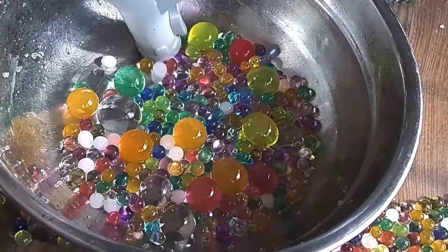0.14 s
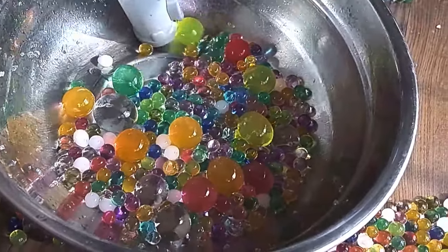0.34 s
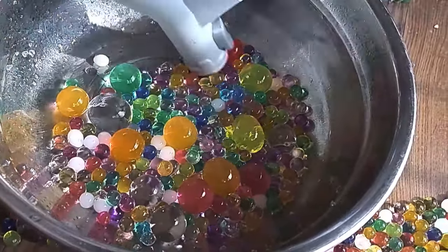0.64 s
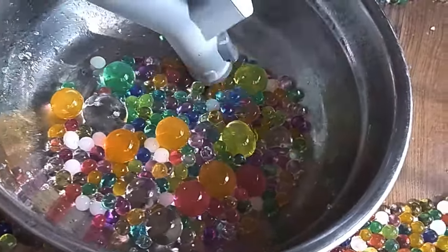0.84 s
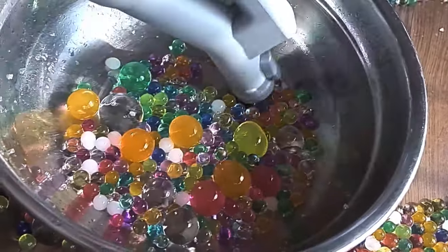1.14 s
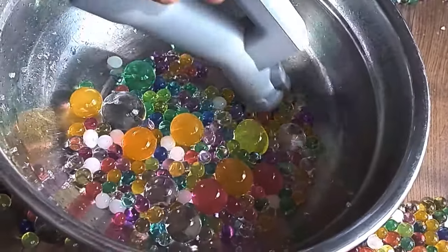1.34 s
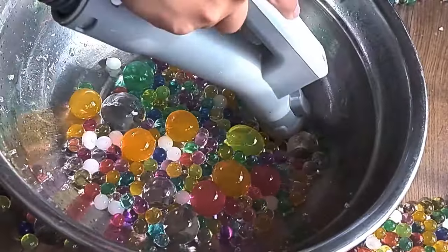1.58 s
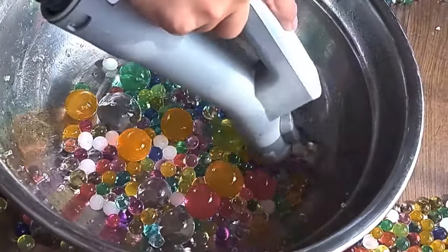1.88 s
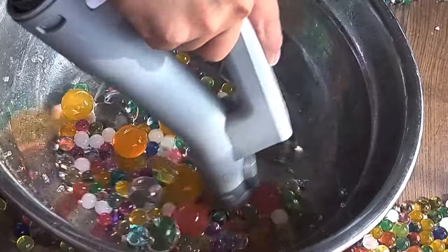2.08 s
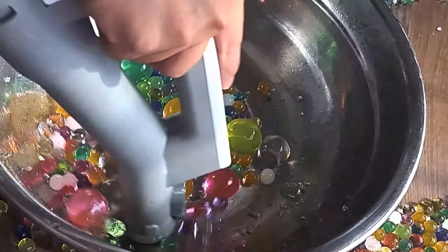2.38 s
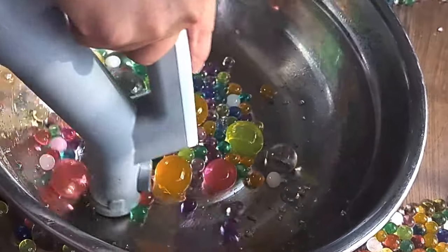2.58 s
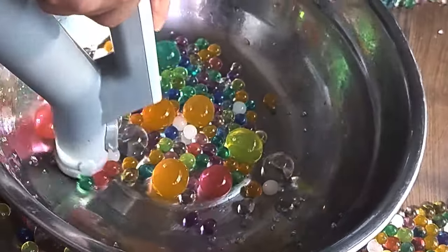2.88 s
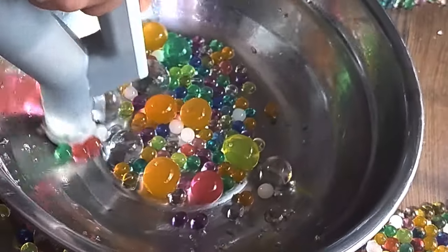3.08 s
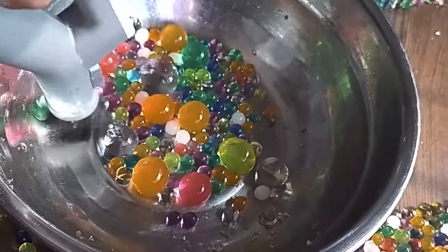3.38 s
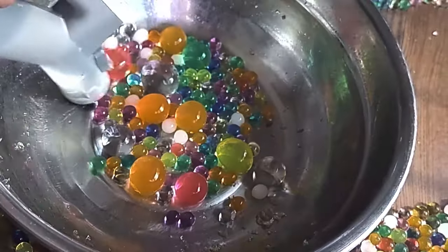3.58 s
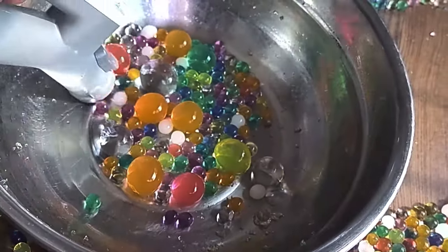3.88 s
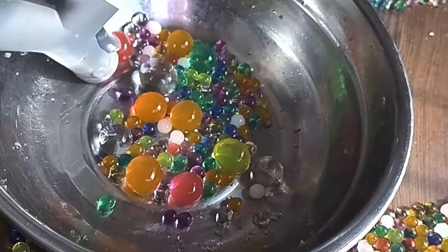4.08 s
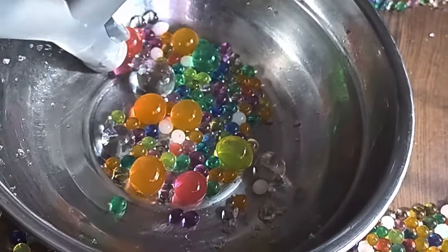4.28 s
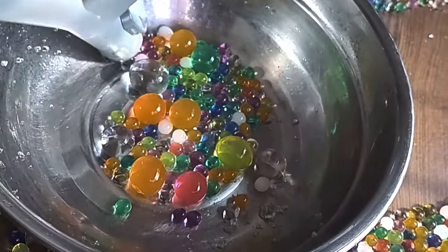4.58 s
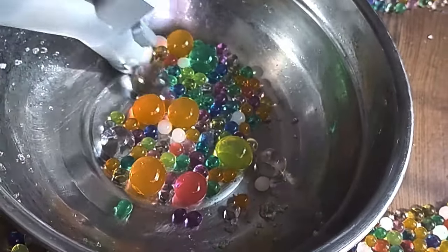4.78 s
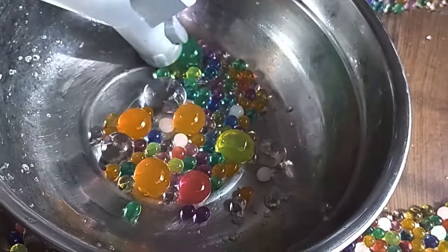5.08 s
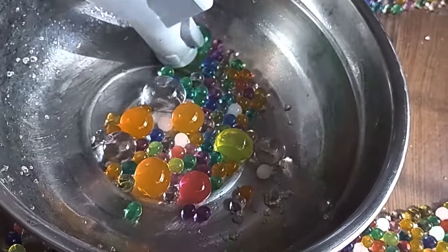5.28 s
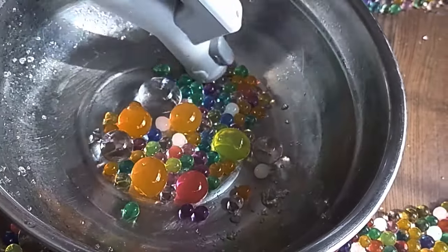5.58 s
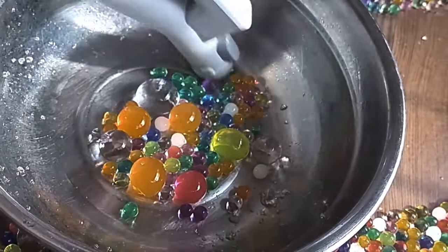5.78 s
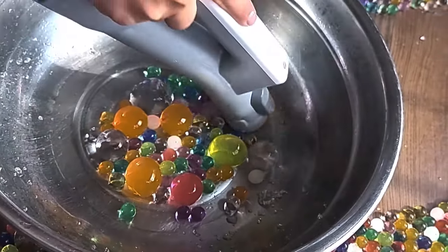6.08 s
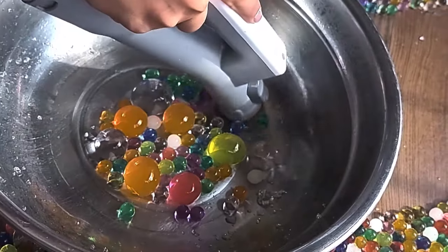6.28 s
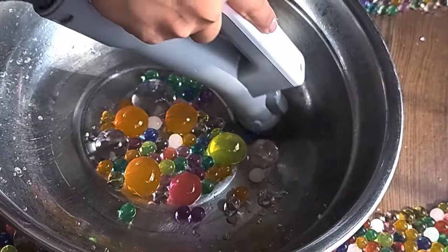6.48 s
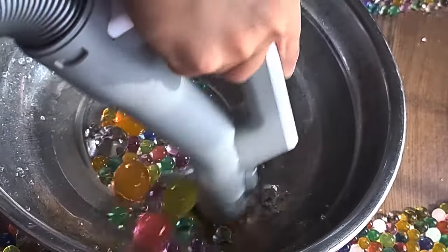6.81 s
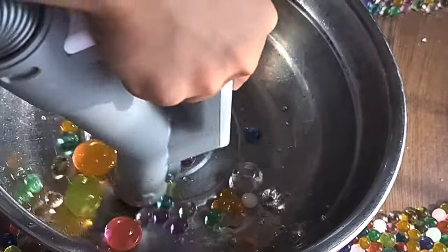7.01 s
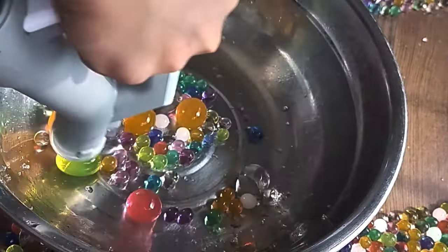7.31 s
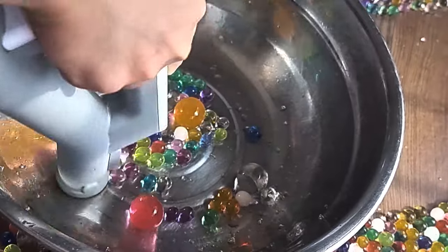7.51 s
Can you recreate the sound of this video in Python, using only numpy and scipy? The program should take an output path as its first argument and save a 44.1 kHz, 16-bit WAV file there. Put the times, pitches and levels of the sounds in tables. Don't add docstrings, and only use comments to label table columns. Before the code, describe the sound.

A small handheld vacuum runs without pause, a thin wavering whine over rough buzz and airy hiss. Beads tumble in a steel bowl with low rumbles, heavy thumps and short metallic taps, densest in the first second and a half. After about three seconds the nozzle repeatedly lands on the steel and buzzes loudly, mostly on the right. Very close stereo microphones beneath the bowl, little room sound.

```python
import sys
import numpy as np
from scipy import signal
from scipy.fft import rfft, irfft, next_fast_len
from scipy.io import wavfile
from scipy.ndimage import uniform_filter1d

SR = 44100
rng = np.random.default_rng(int(sys.argv[2]) if len(sys.argv) > 2 else 0)


def voltage_ratio(level):
    return 10 ** (np.asarray(level, float) / 20)


def unload_audio(sound):
    columns = np.transpose(np.atleast_2d(sound))
    steps = np.round(np.clip(columns, -1, 1) * 32767)
    wavfile.write(sys.argv[1], SR, steps.astype(np.int16))


N = 337365
TIME = np.arange(N) / SR


def columns(table):
    s, *rest = np.transpose(table)
    return [np.interp(TIME, s, c) for c in rest]


def unit(x):
    return x / np.sqrt(np.mean(x ** 2))


def smooth_twice(x, span):
    return uniform_filter1d(uniform_filter1d(x, span), span)


def walk(rate_hz):
    hold = int(SR / rate_hz)
    steps = np.repeat(rng.standard_normal(N // hold + 1), hold)
    return unit(smooth_twice(steps, hold)[:N])


def colour(x, shape):
    hz, db = np.transpose(shape)
    size = next_fast_len(N)
    bins_hz = np.maximum(np.arange(size // 2 + 1) * SR / size, 1)
    gain_db = np.interp(np.log(bins_hz), np.log(hz), db, left=-90, right=-90)
    return unit(irfft(rfft(x, size) * voltage_ratio(gain_db), size)[..., :N])


def ring(x, modes):
    out = 0
    for k, (hz, t60_s, db) in enumerate(modes):
        radius = np.exp(-np.log(1000) / (max(t60_s, .004) * SR))
        w = 2 * np.pi * hz / SR
        poles = [1, -2 * radius * np.cos(w), radius ** 2]
        out = out + (-1) ** k * voltage_ratio(db) * signal.lfilter([1, 0, -1], poles, x)
    return out


def total(*levels_db):
    return 10 * np.log10(sum(voltage_ratio(2 * np.maximum(db, -200)) for db in levels_db))


def sides(db, pan_db):
    db = db - 20 * np.log10(np.cosh(pan_db * np.log(10) / 40))
    return db + pan_db / 2, db - pan_db / 2


def place(x, left_db, right_db, alike, late=0):
    left, other = x if x.ndim > 1 else (x, x)
    right = alike * left + np.sqrt(1 - alike ** 2) * other
    if late:
        lag_s = late * np.tanh((left_db - right_db) / 3) / 2 / SR
        left = np.interp(TIME + lag_s, TIME, left)
        right = np.interp(TIME - lag_s, TIME, right)
    return np.array([left * voltage_ratio(left_db), right * voltage_ratio(right_db)])


def add(out, s, hit, pan_db):
    i = int(s * SR)
    out[:, i:i + len(hit)] += np.outer(voltage_ratio(sides(0, pan_db)), hit)[:, :N - i]


def bursts(rows, rise_db_s, fall_db_s):
    s, length, first, last = (c[:, None].astype(np.float32) for c in np.transpose(rows))
    since = TIME.astype(np.float32) - s
    hold = first + (last - first) * np.clip(since / np.maximum(length, .001), 0, 1)
    return hold - rise_db_s * np.maximum(-since, 0) - fall_db_s * np.maximum(since - length, 0)


# frequency in Hz, level in dB per Hz.
DRONE_SPECTRUM = [(18, -39), (30, -10), (74, 5.5), (433, -5.5), (589, -13.5), (657, -16), (998, -18),
                  (1630, -54), (2060, -4), (2300, -54), (2990, -69), (5060, -120)]


def idle(share):
    press_gain_db = 3
    swell = voltage_ratio(0.79 * walk(15) + press_gain_db * share)
    drone = colour(rng.standard_normal((2, N)), DRONE_SPECTRUM) * swell
    return place(drone, -44, -43.7, alike=0.75)


# time in seconds, blade tone in Hz.
MOTOR_SPEED = [(0, 10675), (.6, 10668), (.92, 10727), (1.33, 10792), (1.66, 10738), (2.0, 10700),
               (2.5, 10670), (3.15, 10735), (3.58, 10648), (3.9, 10695), (4.45, 10655), (4.75, 10695),
               (5.2, 10675), (5.8, 10775), (5.98, 10742), (6.55, 10897), (7.03, 10905), (7.4, 10875)]
BLADES = 18


def motor():
    blade_hz, = columns(MOTOR_SPEED)
    return blade_hz, np.cumsum(blade_hz) / BLADES / SR


# time in seconds, nearness as dB of airborne buzz, lean as left minus right in dB.
NOZZLE_PATH = [(0, -48, 3.5), (.55, -48.5, 4), (.74, -46, 23.5), (.89, -44, 7.5), (1.09, -40.5, 27),
               (1.21, -40, 24.5), (1.43, -40.5, 5), (1.65, -43.5, 8), (2.3, -46, 9), (2.6, -43, 3),
               (2.8, -44, 4), (3.03, -38.5, -9.5), (3.3, -41.5, -10.5), (3.93, -46, -21.5), (4.9, -43, -19),
               (5.05, -45.5, -20.5), (7.0, -44, -16.5), (7.52, -45.5, -15.5)]


def nozzle():
    return columns(NOZZLE_PATH)


def leans(share):
    _, lean_db = nozzle()
    return 0.42 * lean_db - 0.5 * share, 0.7 * lean_db - 8 * share


def heard(press_db, air_db, lean, steel_db, left_db=0, right_db=0):
    steel_leak_db = -32
    near_db, lean_db = nozzle()
    left, right = sides(near_db + air_db, lean * lean_db)
    through_steel_db = press_db + steel_db
    return total(left + left_db, through_steel_db + steel_leak_db), total(right + right_db, through_steel_db)


EAR_LAG = 17


def bowl_echoes(x):
    t60_s, share = 0.05, 0.75
    t = np.arange(2048) / SR
    tail = rng.standard_normal((2, len(t))) * np.exp(-np.log(1000) * t / t60_s)
    tail *= share / np.sqrt(np.sum(tail ** 2, axis=1, keepdims=True))
    tail[:, 0] = 1
    return unit(signal.fftconvolve(x, tail, axes=1)[:, :N])


def lines(turns, orders, levels_db):
    out = 0
    for order, db in zip(orders, levels_db):
        waver = voltage_ratio(db + 4.5 * walk(3.98))
        out = out + waver * np.sin(2 * np.pi * (order * turns + rng.random()))
    return out


def contact(x, drone_db, fizz_db):
    drone = signal.sosfiltfilt(signal.butter(3, 1350, fs=SR, output="sos"), x)
    fizz = signal.sosfiltfilt(signal.butter(2, 2500, "high", fs=SR, output="sos"), x)
    return x + (voltage_ratio(drone_db) - 1) * drone + (voltage_ratio(fizz_db) - 1) * fizz


# frequency in Hz, level in dB per Hz.
BUZZ_SPECTRUM = [(300, -30), (520, -4), (750, -17), (1000, 6), (1500, -14.5), (2000, -1.5), (2350, -15),
                 (2780, -5), (3400, -13), (4200, -17), (5500, -19), (6800, -21.5), (8100, -34),
                 (9000, -25.5), (11700, -19.5)]
BUZZ_ORDERS = [2, 3.285, 4.405, 4.68, 5.4, 6.92, 7.09, 8, 9, 9.8, 10]
BUZZ_LINE_DB = [-22, -22, -16, -19, -23, -29, -26, -26, -30, -38, -34]


def buzz(turns, press_db, share, bright_db):
    noise = colour(rng.standard_normal((2, N)), BUZZ_SPECTRUM) * voltage_ratio(1.2 * walk(12))
    x = bowl_echoes(noise) + lines(turns, BUZZ_ORDERS, BUZZ_LINE_DB)
    x = contact(x, drone_db=3.5 - 12 * share, fizz_db=0.97 * bright_db)
    left, right = heard(press_db, air_db=0, lean=1, steel_db=0)
    return place(x, left + 2.1, right + 2.26, alike=0.44, late=EAR_LAG)


# frequency in Hz, level in dB per Hz.
HISS_SPECTRUM = [(7800, -66), (8600, -54), (10000, -38), (11000, -13), (12500, -2.5), (14000, 3),
                 (15400, 4.5), (15650, -42), (16000, -79)]
HISS_ORDERS = [17, 20, 21.2, 22, 23, 24, 25]
HISS_LINE_DB = [-44, -30, -30, -29, -27, -25, -27]


def hiss(turns, press_db, bright_db):
    noise = colour(rng.standard_normal((2, N)), HISS_SPECTRUM) * voltage_ratio(1.6 * walk(36))
    x = bowl_echoes(noise) + lines(turns, HISS_ORDERS, HISS_LINE_DB)
    levels = heard(press_db + 0.62 * bright_db, air_db=3.2, lean=0.56, steel_db=-8.5)
    return place(x, *levels, alike=0.078)


def bowl_gain(tone_hz, peak_hz, width_hz):
    return 1 / np.sqrt(1 + ((tone_hz - peak_hz) / width_hz) ** 2)


# time in seconds, air gain in dB, extra lean in dB, left's phase lead in turns.
WHINE_AIR = [(0, 4.5, 0.5, -0.55), (.6, 2, 1.5, -0.34), (1.0, 2, -3, -0.51), (1.3, 1.5, -0.5, -0.44),
             (1.6, 3.5, -0.5, -0.32), (2.0, 6.5, -1, -0.62), (2.3, 1, 0.5, -.5), (2.7, -6, 0.5, -.5),
             (2.95, -5, -6.5, -.5), (3.3, 1.5, -2.5, -0.29), (3.75, 3.5, 3, -0.65), (4.3, -2, 1, -1.1),
             (4.85, 4.5, 1, -0.42), (5.3, 6, 4, -0.33), (5.6, 2, -11, -0.36), (6.2, 6, -24, -1),
             (6.9, -2.5, -1, -0.79), (7.6, 5, -4, -0.7)]
# time in seconds, depth in dB (1.9 times that at the very centre), half
# width in seconds.
WHINE_FADES = [(.05, 12, .03), (.2, 11, .03), (.5, 8, .04), (.875, 4, .04), (1.25, 4, .04), (1.55, 5, .03),
               (2.36, 7, .04), (2.6, 3, .03), (2.77, 5, .03), (3.19, 10, .04), (3.41, 8, .03),
               (4.02, 6, .02), (4.26, 9, .04), (4.59, 7, .04), (4.7, 6, .03), (4.98, 8, .05),
               (5.35, 9, .04), (5.51, 5, .03), (5.65, 10, .05), (5.98, 8, .04), (6.19, 6, .03),
               (6.33, 11, .07), (6.54, 5, .04), (7.25, 8, .03), (7.36, 8, .03), (7.5, 8, .03)]


def whine(turns, blade_hz, press_db):
    order = 3.557
    gain_db, lean_db, lead = columns(WHINE_AIR)
    jitter = np.cumsum(3.0 * walk(40)) / SR
    tone = np.sqrt(2) * np.sin(2 * np.pi * (order * turns + jitter + np.outer([1, 0], lead)))
    fade_db = sum(1.9 * db * np.exp(-np.abs(TIME - s) / (0.7 * width)) for s, db, width in WHINE_FADES)
    tone *= voltage_ratio(0.8 * walk(20) - fade_db) * bowl_gain(order * blade_hz / BLADES, 2103, 21.4)
    levels = heard(press_db, air_db=9.5, lean=0.79, steel_db=3.67,
                   left_db=gain_db + lean_db / 2, right_db=gain_db - lean_db / 2)
    return tone * voltage_ratio(np.array(levels))


def sister(turns, blade_hz, press_db):
    order = 3.345
    jitter = np.cumsum(5.2 * walk(30)) / SR
    tone = np.sin(2 * np.pi * (order * turns + jitter)) * voltage_ratio(2.6 * walk(8.8))
    tone *= bowl_gain(order * blade_hz / BLADES, 2030, 15)
    return place(tone, *heard(press_db, air_db=-1, lean=1, steel_db=-4), alike=1, late=EAR_LAG)


def shaft_tone(turns, press_db, share):
    tone = np.sqrt(2) * np.sin(2 * np.pi * turns) * voltage_ratio(2.5 * (2 - share) * walk(6))
    return place(tone, *heard(press_db, air_db=-0.89, lean=0.97, steel_db=-17.5), alike=1, late=EAR_LAG)


# time in seconds, air gain left in dB, air gain right in dB.
BLADE_AIR = [(0, 6, 12), (.3, 0, 6), (.7, 0, 0), (.95, 3, 8), (1.15, -13, -2), (1.5, -2, 8), (1.85, -2, 4),
             (2.15, 7, 2), (2.6, -4, 3), (2.9, -1, 1), (3.15, 4, 11), (3.45, 1, 3), (3.7, -7, -5),
             (4.3, -3, 0), (4.75, 2, 0), (5.3, 6, 5), (5.7, -6, 0), (7.0, -7, 5), (7.3, -14, -22)]


def blade_tone(turns, press_db, share):
    lead = np.outer([1, 0], 0.2 * walk(4) - 0.2)
    tone = np.sqrt(2) * np.sin(2 * np.pi * (BLADES * turns + lead))
    flutter_db = 2.0 * (2 - share) * np.array([walk(11), walk(10)])
    left_db, right_db = columns(BLADE_AIR)
    levels = heard(press_db, air_db=-11.5, lean=1, steel_db=-16.5, left_db=left_db, right_db=right_db)
    return tone * voltage_ratio(flutter_db + np.array(levels))


def vacuum(press_db, share, bright_db):
    blade_hz, turns = motor()
    noises = buzz(turns, press_db, share, bright_db) + hiss(turns, press_db, bright_db)
    bearings = whine(turns, blade_hz, press_db) + sister(turns, blade_hz, press_db)
    return noises + bearings + shaft_tone(turns, press_db, share) + blade_tone(turns, press_db, share)


def grains(per_s, spread_db, push_s):
    force = voltage_ratio(spread_db * np.minimum(rng.exponential(size=(2, N)), 3))
    hits = (rng.random((2, N)) < per_s / SR) * force * rng.choice([-1, 1], size=(2, N))
    return signal.lfilter(np.hanning(int(push_s * SR) + 3), 1, hits)


def even(x, span_s):
    return x / np.sqrt(smooth_twice(np.mean(x ** 2, axis=0), int(span_s * SR)))


# frequency in Hz, T60 in seconds, level in dB.
LOW_MODES = [(49.3, 0.17, -17), (69.9, 0.19, -3), (94, 0.069, -3), (150.5, 0.091, -3.5), (205, 0.04, 0),
             (284.7, 0.055, -2), (385.5, 0.063, -7), (535.4, 0.041, -7)]
# frequency in Hz, T60 in seconds, level in dB.
HIGH_MODES = [(779, 0.049, 0), (880, 0.081, -6), (1000, 0.044, -1), (1165, 0.037, 0.5), (1350, 0.0061, 4)]
# start in seconds, length in seconds, rumble in dB, rattle minus rumble in dB.
STIRS = [(0, 0.0092, -31, -26), (0.094, 0.01, -17.5, -23), (0.235, 0.15, -32.5, -5.5),
         (0.64, 0.25, -16.5, -13.5), (0.86, 0.2, -14.5, -9), (1.119, 0.18, -15.5, -4.5),
         (1.465, 0.038, -18.5, -6.5), (1.608, 0.22, -26, -33), (1.987, 0.28, -37, -24),
         (2.256, 0.087, -26, -10), (2.413, 0.57, -34, -0.5), (2.837, 0.14, -27.5, -2),
         (3.07, 0.094, -25.5, 0), (3.205, 0.0099, -13.5, -7), (3.294, 0.2, -28, -25),
         (3.619, 0.17, -18, -9), (4.037, 0.13, -21, -2), (4.202, 0.36, -29.5, 3), (4.543, 0.11, -12, 0),
         (4.952, .01, -16.5, -19), (5.013, 0.15, -26.5, -9), (5.109, 0.093, -28.5, 9),
         (5.265, 0.22, -12.5, -1.5), (5.547, 0.2, -12.5, -2.5), (5.963, 0.079, -23, -13),
         (6.08, 0.12, -31.5, -0.5), (6.915, 0.049, -29, -4), (7.21, 0.078, -46, 5),
         (7.517, 0.047, -25, -7.5), (7.61, .06, -10.5, -4)]


def stirring(press_db, share):
    rows = np.array(STIRS)
    each = bursts(rows[:, [0, 1, 2, 2]], rise_db_s=336, fall_db_s=122)
    rumble_db = total(each.max(axis=0), -35.5 - 6 * share)
    rattle_db = total((each + rows[:, 3:]).max(axis=0), -42.5, press_db - 26)
    rumble_pan, rattle_pan = leans(share)
    rumble = even(ring(grains(per_s=110, spread_db=3.5, push_s=0.0012), LOW_MODES), span_s=0.082)
    rattle = ring(grains(per_s=500, spread_db=2.0, push_s=0.00022), HIGH_MODES)
    rattle = even(rattle * voltage_ratio(2.0 * walk(35)), span_s=0.076)
    out = place(rumble, *sides(rumble_db - 4.0, rumble_pan), alike=0.94)
    return out + place(rattle, *sides(rattle_db - 6.5, rattle_pan), alike=0.85)


# time in seconds, peak in dB, rattle minus peak in dB, thud pitch in Hz.
THUMPS = [(0.083, -10, -9, 184), (.112, -11.5, -11.5, 158), (.228, -16, -23, 156),
          (0.266, -20.5, -27.5, 205), (0.628, -9, -7.5, 199), (0.665, -9.5, -17, 101),
          (0.726, -2.5, -14, 90), (0.835, 0, -9, 106), (0.952, -3.5, -6, 153), (0.977, -4, -4, 122),
          (1.019, -5.5, 0.5, 194), (1.166, 0, -28, 347), (1.198, 0, -10, 260), (1.226, 4.5, -10, 147),
          (1.268, -4, -28, 133), (1.477, 5.5, -31, 205), (1.501, -8.5, -1, 94), (1.643, -12, -15, 167),
          (1.7, -16, -22, 120), (1.87, -17.5, -17, 82), (2.031, -26, -22, 97), (2.096, -23, -20, 81),
          (2.18, -19, -15, 81), (2.288, -11.5, -22, 98), (2.864, -13, -23, 141), (3.206, 0.5, -20, 77.6),
          (3.633, -19, -24, 90), (3.69, 3.5, -22, 144), (4.052, -3, -13, 159), (4.557, -17, -16, 107),
          (4.65, 0, -26, 115), (4.949, -5, -10, 210), (5.237, -8.5, 1, 266), (5.356, -3, -12, 93),
          (5.434, -9, -16, 149), (5.467, -9, -12, 110), (5.583, -4, -9, 102), (5.645, -8, -4, 95),
          (5.701, -5.5, -8, 105), (5.749, -7, -18, 109), (5.99, -3.5, -15, 146), (6.167, -22, -20, 80),
          (6.95, -15, -28, 103), (7.094, -33, -20, 73), (7.222, -26, -20, 83), (7.512, -20, -9, 73),
          (7.563, -7.5, -24, 175)]


def thumps(share):
    out = np.zeros((2, N))
    t = np.arange(SR // 4) / SR
    rumble_pan, _ = leans(share)
    for s, db, high_db, hz in THUMPS:
        wait, sign = rng.random(2)
        blow = np.exp(-((t - 0.0016) / 0.00052) ** 2)
        blow += 2.3 * (sign - 0.5) * np.exp(-((t - 0.008 - 0.0139 * wait) / 0.00073) ** 2)
        low = ring(blow, LOW_MODES + [(hz, 0.1, 6.0)])
        high = ring(blow, HIGH_MODES)
        hit = low / np.abs(low).max() + voltage_ratio(high_db) * high / np.abs(high).max()
        add(out, s, voltage_ratio(db - 6.5) * hit, rumble_pan[int(s * SR)])
    return out


# time in seconds, peak in dB, ring in Hz.
TAPS = [(.088, -32, 880), (0.268, -16, 826), (.31, -17, 780), (.335, -19, 1000), (.355, -18, 770),
        (0.561, -13.5, 806), (0.59, -15, 836), (0.633, -13, 877), (.667, -16, 781), (.709, -19, 940),
        (.725, -23, 797), (0.837, -14, 890), (0.868, -7, 818), (1.018, -6, 1000), (1.108, -7.5, 810),
        (1.139, -1, 765), (1.172, -6, 873), (1.18, -28, 4220), (1.195, -4.5, 904), (1.2, -27, 3600),
        (1.215, -27, 4170), (1.237, -5.5, 690), (1.316, -7, 796), (1.36, -21, 1064), (1.479, 0, 815),
        (2.322, -14, 780), (3.208, -11.5, 760), (3.595, -14, 786), (4.02, -15, 1200), (4.057, -11, 1230),
        (4.354, -23, 1200), (4.442, -21, 1110), (4.469, -17, 1080), (4.485, -11, 1000), (4.518, -15, 766),
        (4.532, -1, 1000), (4.603, -3.5, 1010), (4.677, -8, 1000), (4.952, -6.5, 795), (5.101, -18, 1010),
        (5.234, -5, 1000), (5.253, -0.5, 780), (5.438, -8, 1065), (5.457, -13, 1020), (5.553, -1, 1077),
        (5.574, 2, 878), (5.63, -4, 1330), (5.633, -3, 798), (5.65, -5, 820), (5.731, -0.5, 1042),
        (6.001, -17, 1220), (6.846, -11.5, 1030), (6.888, -13, 1000), (6.925, -13, 976), (7.522, -11, 866),
        (7.575, -10, 983), (7.62, -4, 957)]


def taps(share):
    out = np.zeros((2, N))
    t = np.arange(SR // 4) / SR
    swell = (1 - np.exp(-t / 0.001)) * np.exp(-t / 0.0082)
    _, rattle_pan = leans(share)
    for s, db, hz in TAPS:
        tone = np.sin(2 * np.pi * hz * t) + 0.32 * np.sin(2 * np.pi * 1.29 * hz * t)
        add(out, s, voltage_ratio(db - 7.5) * swell * tone, rattle_pan[int(s * SR)])
    return out


# start in seconds, length in seconds, buzz at start in dB, at end in dB, brightness in dB.
PRESSES = [(2.693, 0.13, -41.5, -41, 2.5), (2.834, 0.29, -43.5, -39, 10.5), (3.046, 0.071, -34, -23.5, 5.5),
           (3.135, .14, -28, -28.5, -1.5), (4, 0.23, -21.5, -16.5, 3.5), (4.238, 0.26, -19.5, -19.5, 3),
           (4.507, 0.16, -21.5, -22.5, -0.5), (4.688, 0.2, -24.5, -31.5, -1.5),
           (5.103, .15, -21.5, -21, -0.5), (5.272, 0.29, -21, -18.5, -5.5), (5.595, 0.13, -27.5, -18, 4),
           (5.737, .3, -21.5, -22, 5), (6.04, 0.34, -22.5, -21, 7.5), (6.369, 0.12, -23, -20.5, 10),
           (6.497, 0.133, -20, -21.5, 9), (6.638, 0.31, -18, -21.5, 4.5), (7.563, 0.15, -23.5, -18.5, 4)]


def pressing():
    near_db, lean_db = nozzle()
    rows = np.array(PRESSES)
    each = bursts(rows[:, :4], rise_db_s=700, fall_db_s=598)
    press_db = each.max(axis=0)
    air_right_db = sides(near_db, lean_db)[1]
    share = 1 / (1 + voltage_ratio(2 * np.minimum(air_right_db - press_db, 100)))
    return press_db, share, share * rows[each.argmax(axis=0), 4]


def scene():
    press_db, share, bright_db = pressing()
    motor_sound = idle(share) + vacuum(press_db, share, bright_db)
    return motor_sound + stirring(press_db, share) + thumps(share) + taps(share)


def low_pass(x):
    return signal.sosfilt(signal.butter(12, 16750, fs=SR, output="sos"), x)


def record(dry):
    notch_hz, notch_width_hz = 8120, 300
    heard_by_mic = signal.lfilter(*signal.iirnotch(notch_hz, notch_hz / notch_width_hz, fs=SR), dry)
    rounded = np.tanh(0.9 * heard_by_mic) / 0.85
    mix = signal.sosfilt(signal.ellip(8, 0.1, 60, 15650, fs=SR, output="sos"), rounded)
    return low_pass(mix)


dry = scene()
out = record(dry)
unload_audio(out)
```